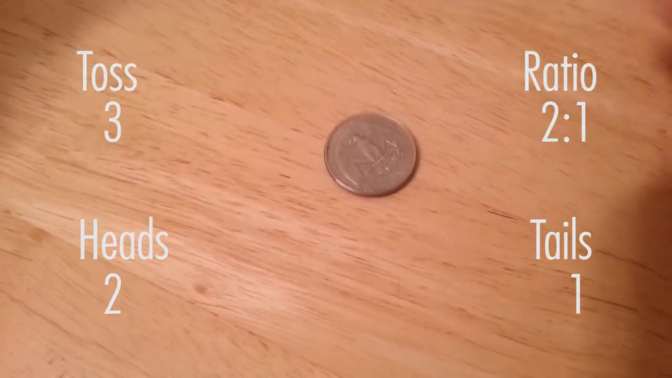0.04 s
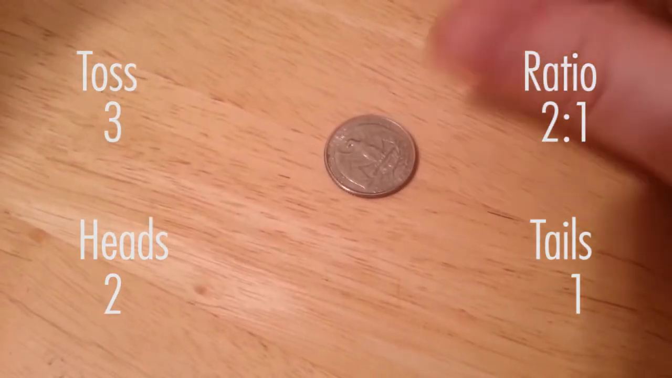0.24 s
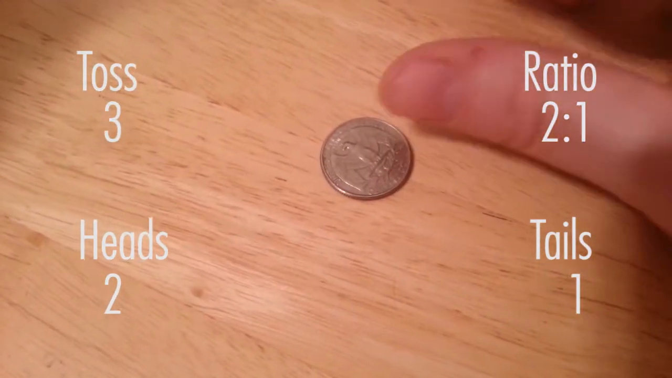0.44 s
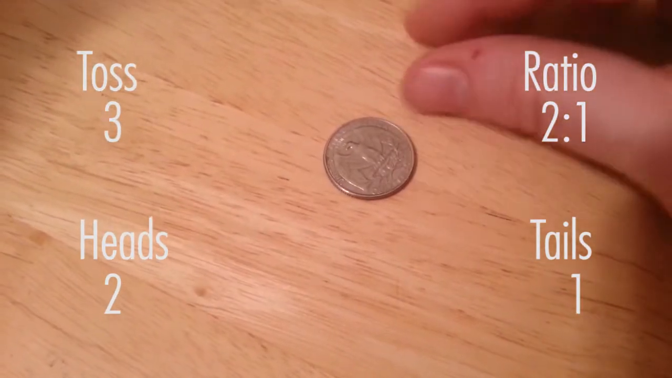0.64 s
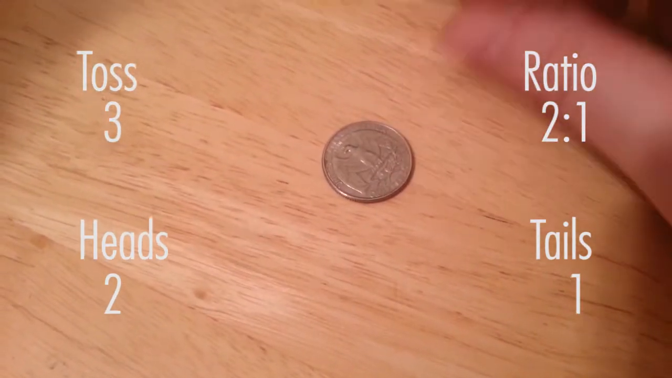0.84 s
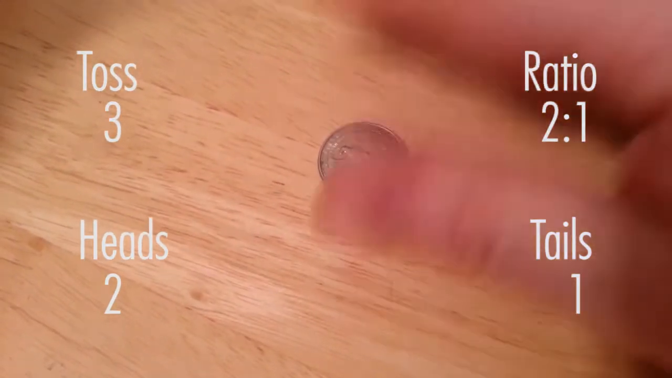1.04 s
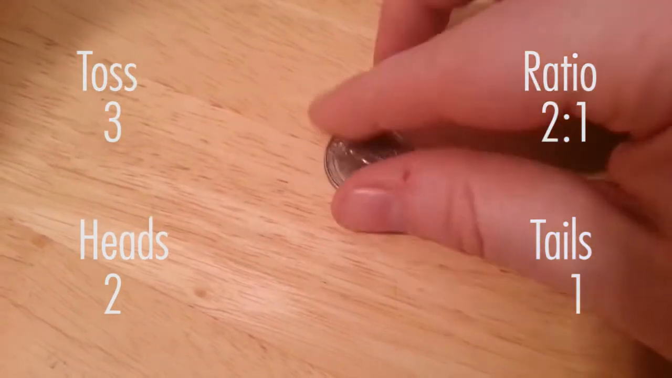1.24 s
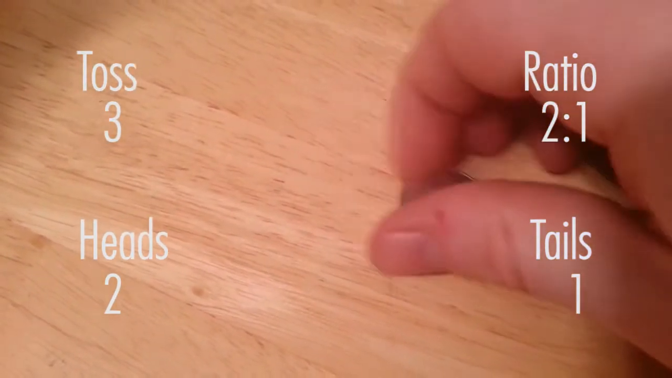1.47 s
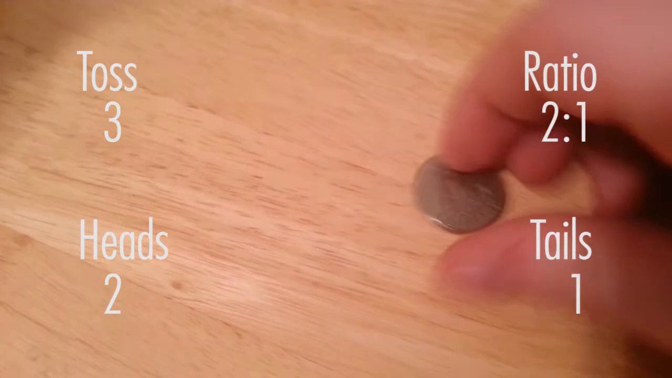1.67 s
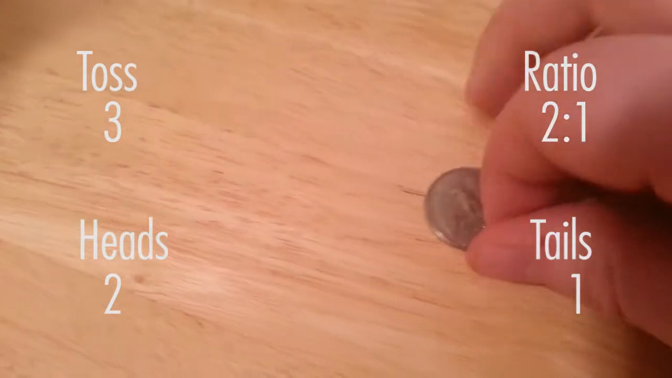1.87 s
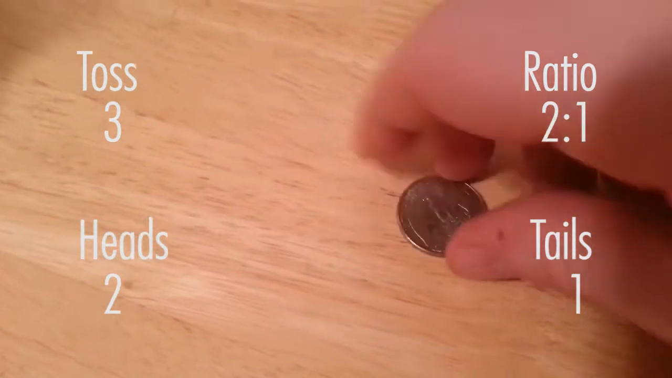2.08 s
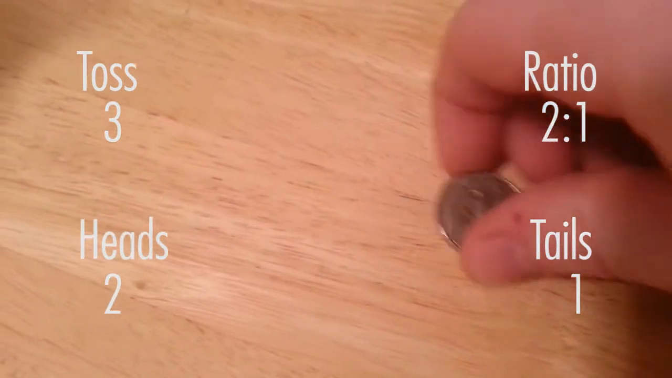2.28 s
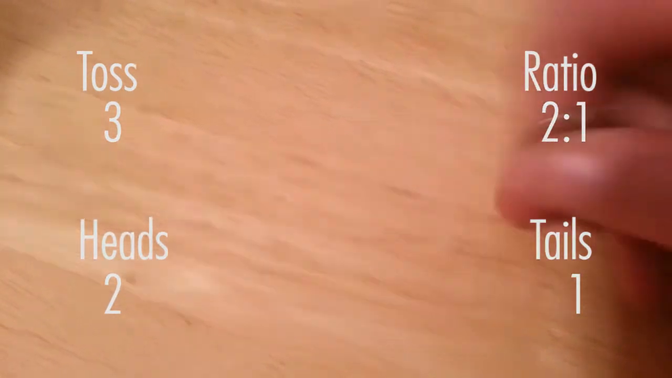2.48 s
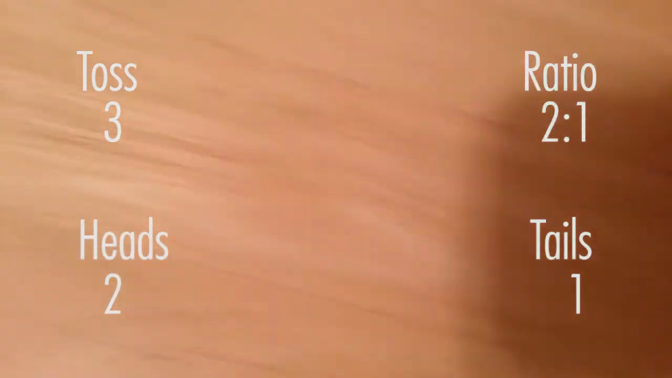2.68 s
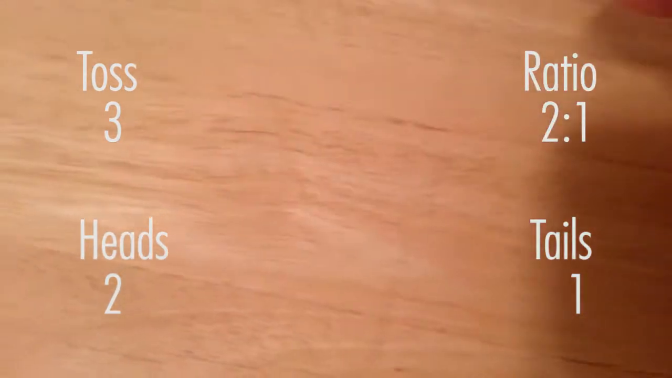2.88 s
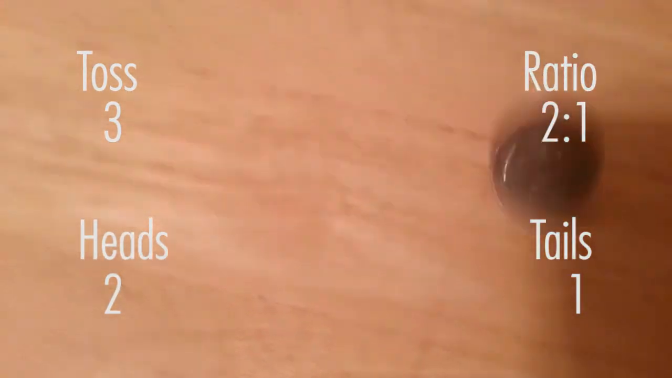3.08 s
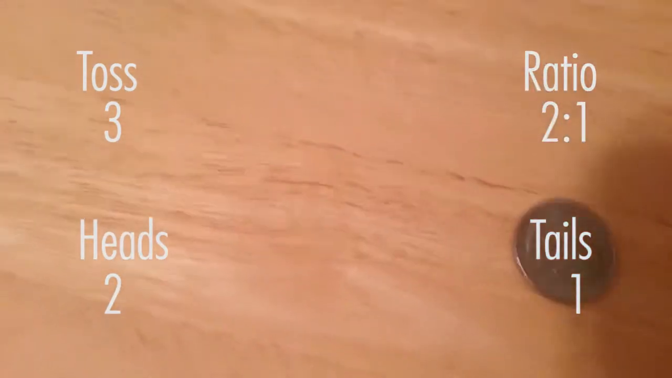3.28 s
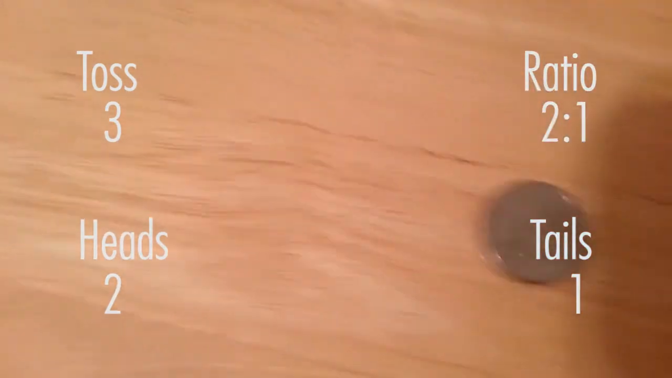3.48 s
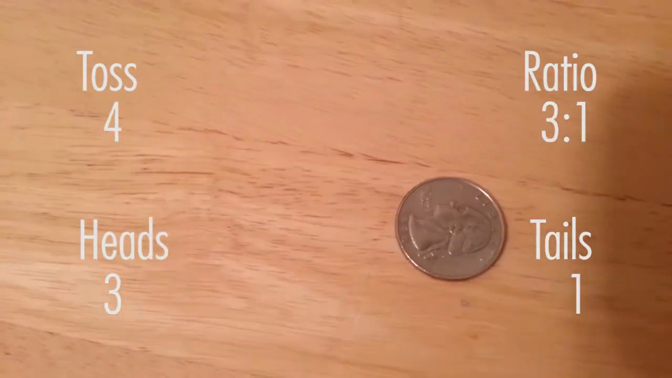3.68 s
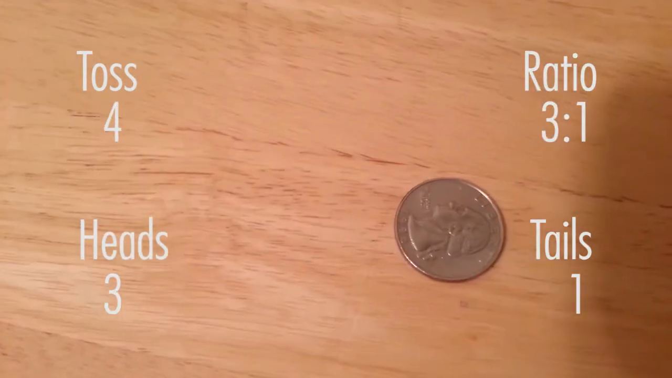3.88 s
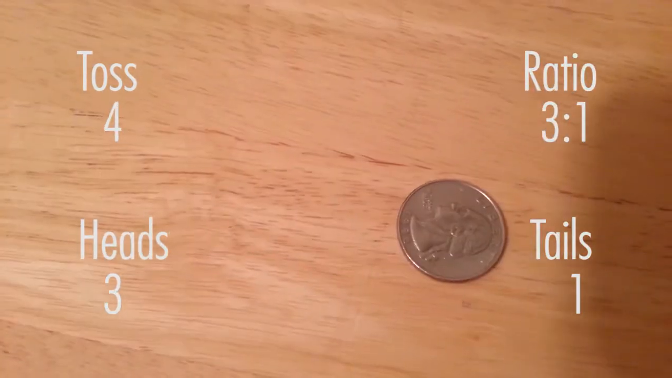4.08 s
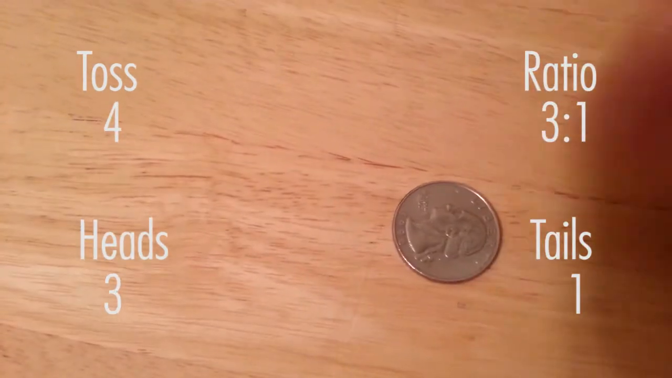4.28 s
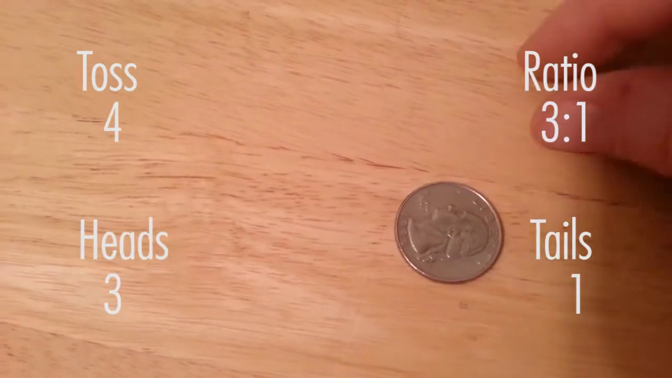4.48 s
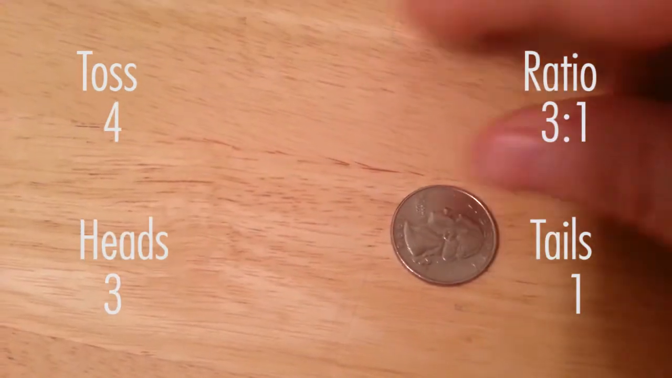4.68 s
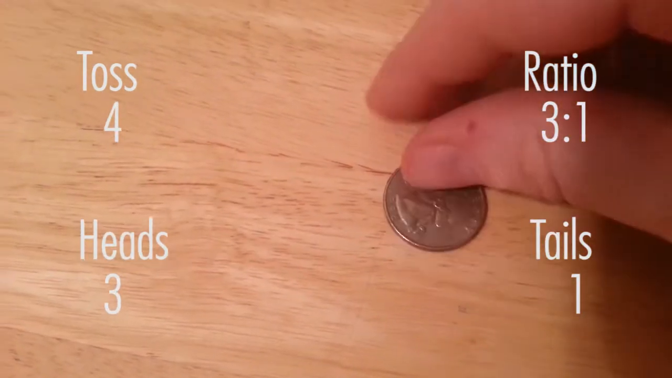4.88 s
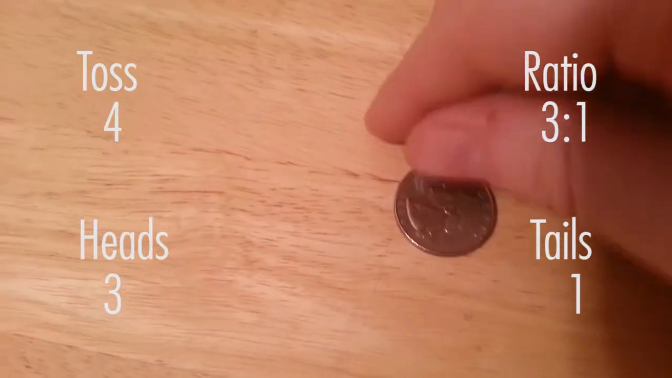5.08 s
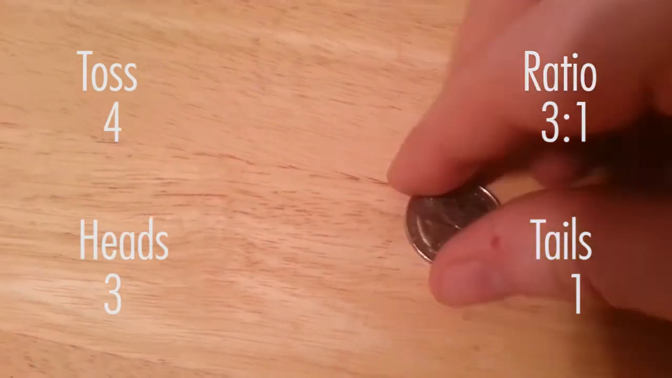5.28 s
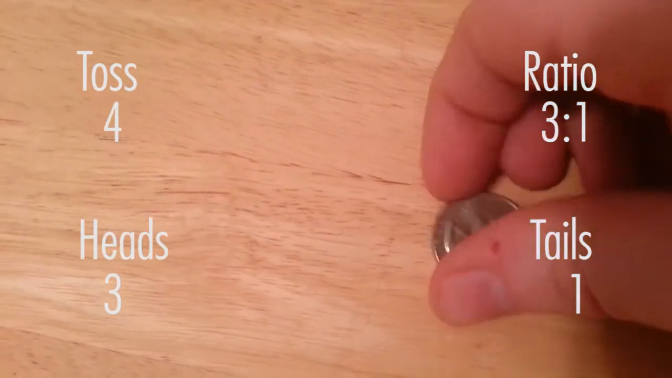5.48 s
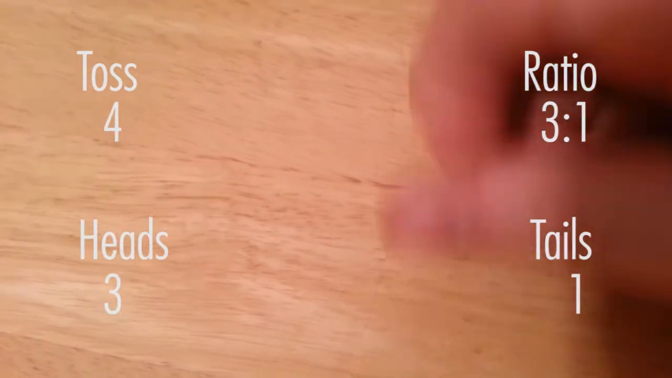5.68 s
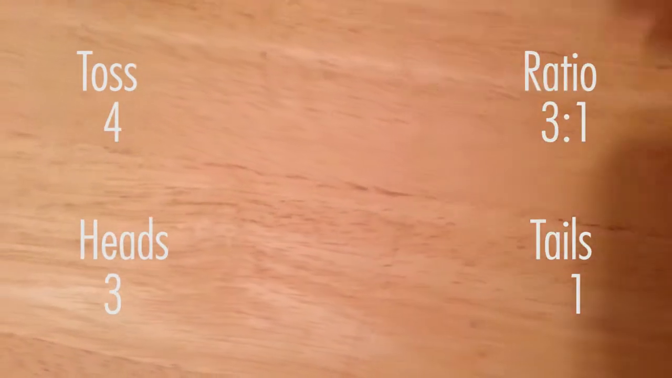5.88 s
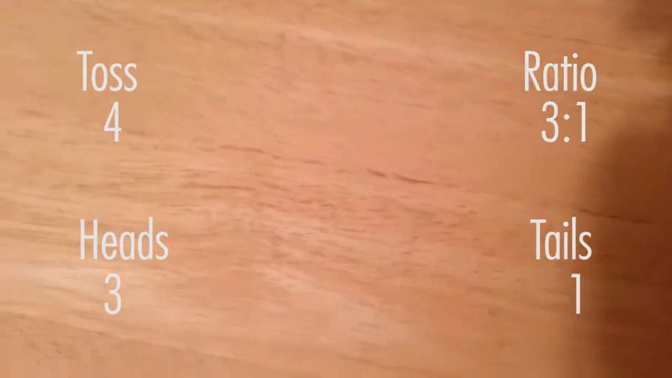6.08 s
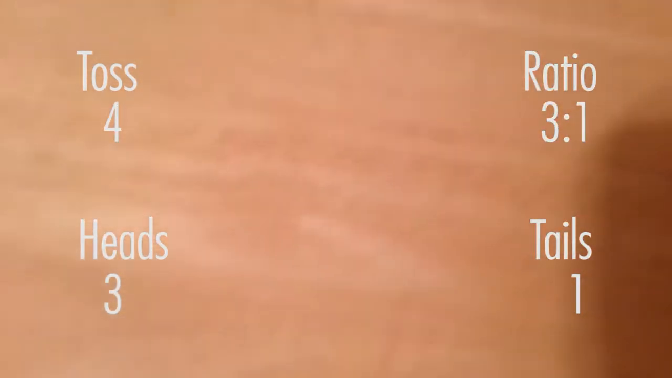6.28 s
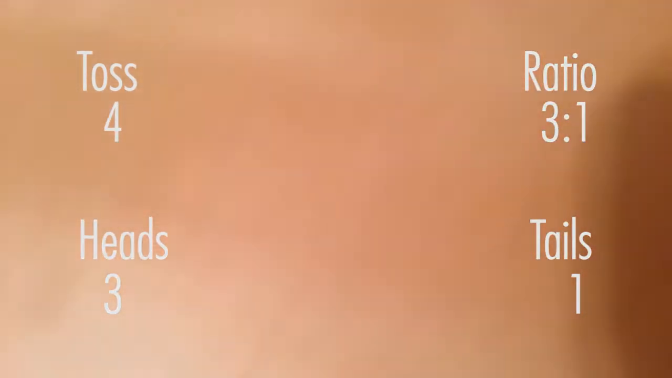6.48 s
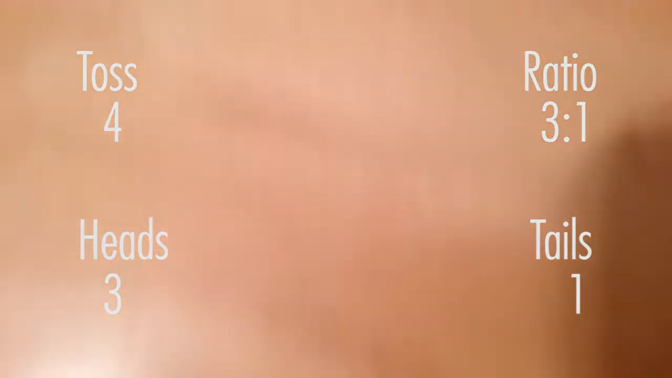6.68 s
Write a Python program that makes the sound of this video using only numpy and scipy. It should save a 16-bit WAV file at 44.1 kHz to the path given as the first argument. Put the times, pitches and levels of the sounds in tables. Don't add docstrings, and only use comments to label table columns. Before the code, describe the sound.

Close to a wooden table in a small room, a metal coin finishes rattling. Dull arm thumps, dragging skin and metal, light clicks and a cloth swish lead to a toss: a hard, overloaded knock, bright metallic ringing and an accelerating clatter that stops abruptly. Gentle handling and a short scrape follow, then another heavy, flatter landing with quick dull bounces. Soft hiss and rumble stay underneath.

```python
import sys
import numpy as np
from scipy import signal
from scipy.fft import rfft, irfft
from scipy.io import wavfile
from scipy.ndimage import uniform_filter1d

SR = 44100
rng = np.random.default_rng(int(sys.argv[2]) if len(sys.argv) > 2 else 0)


def amplitude_ratio(level_db):
    exponent = np.asarray(level_db, float) / 20
    return 10 ** exponent


def generate_wav(sig):
    pcm = np.round(np.clip(np.atleast_2d(sig).T, -1, 1) * 32767).astype(np.int16)
    wavfile.write(sys.argv[1], SR, pcm)


N = 297234


def evened(x):
    return x / np.sqrt(np.mean(x ** 2) + 1e-20)


def read(points, hz):
    f, value = np.transpose(points)
    return np.interp(np.log(hz + 1), np.log(f + 1), value)


def add(mix, s, sound):
    part = mix[..., round(s * SR):][..., :sound.shape[-1]]
    part += sound[..., :part.shape[-1]]


def band_filter(x, order, hz, kind):
    return signal.sosfilt(signal.butter(order, hz, kind, fs=SR, output="sos"), x)


def pair_noise(count, colour, same):
    hz = np.fft.rfftfreq(count, 1 / SR)
    a, b = rfft(rng.standard_normal((2, count)))
    likeness = read(same, hz)
    right = likeness * a + np.sqrt(1 - likeness ** 2) * b
    return irfft(np.array([a, right]) * amplitude_ratio(read(colour, hz)), count)


def resonate(x, hz, width):
    turn = np.exp(2j * np.pi * np.cumsum(hz) / SR)
    r = np.exp(-np.pi * width / SR)
    return 2 * (turn * signal.lfilter([1 - r], [1, -r], x / turn)).real


def chatter(count, chatter_db, per_s):
    size = amplitude_ratio(chatter_db * np.minimum(rng.exponential(1, count), 5))
    return evened(size * rng.choice([-1, 1], count) * (rng.random(count) < per_s / SR))


def stroke(peak, rise, fall, db):
    t = np.arange(-min(rise, peak), fall, 1 / SR)
    far = np.where(t < 0, -t / rise, t / fall)
    gain = amplitude_ratio(db - 16.5 * far ** 1.36)
    return peak + t[0], t, gain * np.minimum((fall - t) / .004, 1)


# f/Hz, level/dB [per Hz]
KNOCK_COLOUR = [(53, -45), (90, -7), (248, -9), (301, -14.5), (357, 3.5), (599, -14), (667, -12.5),
                (1300, -3), (3290, -10), (6980, -18), (8300, -24.5), (9860, -21), (10700, -29.5),
                (15500, -34)]
# f/Hz, t60/s
ROOM_FADE = [(150, 0.31), (400, 0.41), (1040, 0.33), (2760, 0.42), (7280, 0.29), (14000, 0.08)]
# f/Hz, likeness [-1 to 1]
KNOCK_SAME = [(60, 0.69), (180, 0.99), (550, 0.63), (1650, -0.11), (4970, 0.14), (15000, 0.58)]
# f/Hz, width/Hz, level/dB
BOARD_MODES = [(255, 25, -3), (366, 18, -2), (497, 25, 0), (547, 25, -3), (673, 16, -5), (759, 20, -6),
               (964, 24, -7), (1105, 16, -6), (1179, 18, -4), (1495, 25, -5), (2014, 24, -2), (2332, 36, 0),
               (2756, 27, 2), (2940, 25, -3), (3181, 18, -2), (3340, 40, 0), (4235, 45, -6), (4890, 70, -2),
               (5906, 40, -13), (7060, 100, -14), (9540, 130, -12)]


def knock(board_db=-.6, crack_db=9.5, crack_s=.004, rise_s=.0003, tick_db=9., tick_s=.001):
    t = np.arange(16384) / SR
    hz, frame, z = signal.stft(pair_noise(len(t), KNOCK_COLOUR, KNOCK_SAME), SR, nperseg=256)
    z = z * amplitude_ratio(-60 * frame / read(ROOM_FADE, hz)[:, None])
    tail = signal.istft(z, SR, nperseg=256)[1][:, :len(t)]
    tail *= 1 + amplitude_ratio(crack_db) * np.exp(-t / crack_s)
    board = np.zeros((2, len(t)))
    for hz, width, db in BOARD_MODES:
        db = db + 2.5 * rng.standard_normal()
        phase = 2 * np.pi * rng.random((2, 1)) * min(hz / 2000, 1)
        ring = np.exp(-np.pi * width * t) * np.sin(2 * np.pi * hz * t + phase)
        board += amplitude_ratio(db) * np.sqrt(width) * ring
    both = (evened(tail) + amplitude_ratio(board_db) * evened(board)) * (1 - np.exp(-t / rise_s))
    body = band_filter(both * (1 + 1.3 * np.exp(-t / .001)), 4, [700, 4500], "band")
    edge = band_filter(both * (1 + amplitude_ratio(tick_db) * np.exp(-t / tick_s)), 4, 4500, "high")
    boom = band_filter(both, 3, 700, "low")
    return [band / np.linalg.norm(band[0]) for band in (body, edge, boom)]


def table():
    force = np.zeros((3, 3, N))
    for contact in (roll, drag, tap, spin, flop):
        contact(force)
    out = np.zeros((2, N))
    for trains in force:
        for train, answer in zip(trains, knock()):
            out += signal.oaconvolve(train[None], answer, axes=1)[:, :N]
    return out


# peak t/s, rise/s, fall/s, level/dB, edge sharpness/dB
ROLLS = [(0, .011, 0.021, -30, 3), (0, 0.012, 0.2, -25.5, -9), (0.099, 0.089, 0.3, -30, -9),
         (.185, 0.063, 0.052, -22, -4), (.245, 0.036, 0.07, -25, -3), (0.299, .05, 0.069, -24, -6),
         (3.24, .1, 0.39, -24, -7.5), (3.61, .09, 0.14, -28, -10.5), (6.4, 0.094, 0.061, -23.5, -34),
         (6.525, 0.028, 0.093, -20.5, -23), (6.685, 0.051, 0.042, -21.5, -15.5)]


def roll(force, rim_hz=2980, rim_width_hz=3850, rim_db=-3.5, boom_db=-9):
    for peak, rise, fall, db, edge_db in ROLLS:
        s, t, gain = stroke(peak, rise, fall, db)
        grains = chatter(SR, 1.5, 1500)[:len(t)] * gain
        spot = rng.integers(0, 3, len(t))
        for k in range(3):
            part = grains * (spot == k)
            bright = resonate(part, rim_hz + 0 * t, rim_width_hz) * SR / (2 * np.pi * rim_width_hz)
            rim = part + amplitude_ratio(rim_db) * bright
            add(force[k], s, np.array([rim / 2, part * amplitude_ratio(edge_db), part * amplitude_ratio(boom_db)]))


# t/s, level/dB, t60/s, damping by contact [from 0, capped at 3]
RINGS = [(0., -29, 0.34, 2.7), (.065, -37.5, 0.95, 3.5), (.165, -29, 0.79, 3.3), (.198, -30.5, .45, 2.9),
         (0.262, -38, 0.34, 2.3), (3.012, -44, 1.1, 0.37), (3.156, -20, 0.33, 0.39),
         (3.232, -26.5, 0.18, 1.4), (3.296, -29.5, 1, 3.7), (3.346, -20, 0.22, 3.5),
         (3.394, -23.5, .2, 3.55), (3.434, -21, 0.11, 3.4), (3.474, -28.5, 0.16, 2.1),
         (3.53, -33.5, 0.55, 1.7), (3.575, -35, .2, 3.2), (3.64, -42.5, 0.57, 2.4),
         (6.235, -46.5, 0.99, .4), (6.37, -48.5, 1.6, .44), (6.51, -49.5, 1.1, 0.57),
         (6.66, -59, 0.3, 0.36)]
FLAT_S = [
    0.322,
    3.71,
    6.74,
]


def coin(ring_hz=9536, split_hz=22, lean_db=3.5, wet_db=-4.5, echo_t60=.08):
    out, t = np.zeros((2, N)), np.arange(SR // 2) / SR
    for s, db, t60, damping in RINGS:
        scatter = 7 * np.clip(damping, 0, 3) * rng.standard_normal((2, len(t)))
        drift = np.cumsum(scatter, 1) / np.sqrt(SR)
        turn = 2 * np.pi * (ring_hz + split_hz * np.array([[-1], [1]])) * t + drift
        ring = evened(np.cos(turn[0]) + .7 * np.cos(turn[1]))
        ring *= (1 - np.exp(-t / .0047)) * amplitude_ratio(-60 * t / t60)
        flat_after = min(f for f in FLAT_S if f > s) - s
        ring *= np.clip((min(flat_after, t[-1]) - t) / 0.036, 0, 1)
        add(out, s, amplitude_ratio(db + lean_db * np.array([[1], [-1]])) * ring)
    t = np.arange(6000) / SR
    echo = rng.standard_normal((2, len(t))) * amplitude_ratio(-60 * t / echo_t60)
    echo /= np.linalg.norm(echo[0])
    return out + amplitude_ratio(wet_db) * signal.oaconvolve(out, echo, axes=1)[:, :N]


# f/Hz, level/dB [per Hz]
HUSH_COLOUR = [(15, -67), (25, -14.5), (71, 3), (113, -4), (203, -6.5), (304, -8.5), (358, -13),
               (420, -13.5), (481, -15), (1170, -23.5), (1300, -22.5), (2220, -25.5), (5120, -24),
               (15400, -34.5)]
# f/Hz, likeness [-1 to 1]
HUSH_SAME = [(60, 0.63), (180, 0.72), (550, 0.28), (1650, 0.11), (4970, -0.52), (15000, 0.24)]


def hush(level_db=-47.5, swell_db=.9, split_hz=600):
    swell = evened(uniform_filter1d(rng.standard_normal(N), 5000))
    noise = amplitude_ratio(level_db) * evened(pair_noise(N, HUSH_COLOUR, HUSH_SAME))
    rumble = signal.sosfiltfilt(signal.butter(2, split_hz, fs=SR, output="sos"), noise)
    return noise + (amplitude_ratio(swell_db * swell) - 1) * rumble


# peak t/s, rise/s, fall/s, level/dB, hollow under the fingers f/Hz
DRAGS = [(.442, .012, 0.033, -50, 1495), (.57, .12, 0.19, -54, 1450), (1.255, .09, 0.05, -50, 1680),
         (1.36, .08, 0.057, -55, 1730), (1.455, .06, 0.071, -42, 2260), (1.58, .07, 0.15, -54.5, 1880),
         (1.7, .07, 0.033, -38.5, 2900), (1.755, .05, 0.049, -37.5, 1840), (1.83, .03, 0.045, -32.5, 900),
         (2.005, .02, 0.046, -50, 1920), (2.07, .012, 0.042, -46, 1240), (2.176, .02, 0.089, -43.5, 1800),
         (2.39, .011, 0.043, -40.5, 2260), (2.435, .04, 0.087, -49, 1370), (4.44, .03, 0.18, -58, 1155),
         (4.612, .012, 0.051, -45.5, 1050), (4.71, .05, 0.058, -60.5, 1400),
         (4.865, .08, 0.037, -45.5, 1900), (5.078, .05, 0.037, -56, 1390), (5.29, .04, 0.14, -52, 2200),
         (5.5, .25, 0.51, -55.5, 2250), (5.684, 0.014, 0.012, -24.5, 1220), (1.5, .07, 0.13, -45.5, 4030),
         (1.745, .07, 0.062, -44.5, 4230)]


def drag(force, hollow_width_hz=450, hollow_db=-2.5, close_hz_per_s=2000):
    for k, (peak, rise, fall, db, hz) in enumerate(DRAGS):
        s, t, gain = stroke(peak, rise, fall, db)
        grains = chatter(SR, 3, 1200)[:len(t)]
        hollow_hz = np.maximum(hz - close_hz_per_s * t, .7 * hz)
        hollow = evened(resonate(grains, hollow_hz, hollow_width_hz))
        cupped = evened(grains + amplitude_ratio(hollow_db) * hollow)
        harder_db = db + 49.5
        edge = grains * amplitude_ratio(-14 - .6 * harder_db)
        boom = grains * amplitude_ratio(2.5 - .5 * harder_db)
        add(force[k % 3], s, gain * np.array([cupped, edge, boom]))


# t/s, level/dB [peak], f/Hz, t60/s
THUMPS = [(0.432, -40.5, 74, 0.075), (0.552, -37, 79.8, 0.17), (0.828, -50, 74, 0.15),
          (1.129, -32.5, 116, 0.16), (1.526, -22, 85, 0.084), (2.175, -25, 74, 0.14),
          (2.383, -24, 79, 0.091), (2.596, -34.5, 132.3, 0.21), (2.72, -41, 79, 0.13),
          (2.948, -41, 139.6, 0.14), (4.376, -30, 66.3, 0.14), (4.681, -28.5, 98.4, 0.072),
          (4.848, -58.5, 73.5, 0.42), (5.569, -29.5, 120.6, 0.11), (6.598, -29, 73.7, 0.13)]


def thumps(rise_s=0.0072, second=1.7, second_db=-3.5):
    out, t = np.zeros(N), np.arange(14000) / SR
    for s, db, hz, t60 in THUMPS:
        modes = np.sin(2 * np.pi * hz * t) + amplitude_ratio(second_db) * np.sin(2 * np.pi * hz * second * t)
        add(out, s, amplitude_ratio(db + 7 - 60 * t / t60) * (1 - np.exp(-t / rise_s)) * modes)
    return out * amplitude_ratio(.4 * np.array([[1], [-1]]))


# t/s, level/dB [peak]
CREAKS = [
    (0.4394, -29),
    (0.4653, -40),
    (0.4893, -37),
    (0.5137, -35),
    (0.5382, -35),
    (0.5671, -36),
    (0.5846, -36),
    (0.606, -38),
]


def creak(hz=1500, t60=.025, width_hz=600):
    out, t = np.zeros((2, N)), np.arange(2500) / SR
    for s, db in CREAKS:
        noise = rng.standard_normal((2, len(t)))
        tick = evened(band_filter(noise, 2, [hz - width_hz / 2, hz + width_hz / 2], "band"))
        add(out, s, amplitude_ratio(db + 1 - 60 * t / t60) * tick)
    return out


def blow(force, spot, s, db, edge_db, boom_db, graze=0):
    skid_s = .009 * graze * np.append(0, rng.random(4))
    share = np.append(1, graze * rng.choice([-1, 1], 4))[:, None]
    touch = amplitude_ratio(17 + db + np.array([0, edge_db, boom_db])) / np.linalg.norm(share)
    np.add.at(force[spot].T, ((s + skid_s) * SR).astype(int), touch * share)


# t/s, level/dB, edge sharpness/dB, table boom/dB
TAPS = [(1.257, -29, -32, -28), (1.326, -38, -17, 4.5), (1.528, -27.5, -19, 5), (1.537, -20.5, -19, -33),
        (1.639, -26, -29, -11), (1.675, -26, -23, -4.5), (1.798, -23, -26, 16), (1.84, -30, -8, 15.5),
        (2.0, -30.5, -40, 5), (2.068, -33, -34, -8), (2.173, -23.5, -40, 0), (2.385, -31, -22, 2),
        (4.61, -43, -27.5, -16), (5.077, -43, -32.5, 0), (5.288, -31.5, -37, -2.5), (5.438, -37, -12, 4),
        (5.526, -41.5, -8, 3), (5.574, -33.5, -26, 7), (5.68, -45.5, -28.5, -23), (6.144, -39, -11, -17.5)]


def tap(force):
    for k, row in enumerate(TAPS):
        blow(force, k % 3, *row)


# peak t/s, rise/s, fall/s, level/dB
SLIDES = [
    (2.32, .12, 0.18, -53),
    (2.6, 0.26, 0.19, -52),
    (2.76, .08, 0.15, -52.5),
    (5.3, .15, 0.23, -54),
    (5.52, 0.2, 0.35, -50.5),
    (5.7, 0.057, 0.12, -40),
]


def slide(hz=1168, width_hz=120):
    out, rub = np.zeros(N), rng.standard_normal(N)
    for row in SLIDES:
        s, t, gain = stroke(*row)
        add(out, s, gain)
    curve, hum = np.full(N, hz), []
    for noise in (rub, rub + rub[::-1]):
        narrow = resonate(noise, curve, width_hz)
        hum.append(evened(resonate(narrow, curve, 2 * width_hz)))
    return out * np.array(hum)


# f/Hz, level/dB [per Hz]
SLEEVE_COLOUR = [(200, 8.5), (600, -2.5), (2000, -3), (6000, -5), (12000, -15.5), (15500, -34.5)]


def swish():
    out = np.zeros((2, N))
    s, t, gain = stroke(peak=2.645, rise=0.066, fall=0.16, db=-42.5)
    add(out, s, gain * evened(pair_noise(SR, SLEEVE_COLOUR, HUSH_SAME))[:, :len(t)])
    return out


def bounce_boom_db(db):
    return -10.5 + 0.12 * min(db, 0)


# t/s, level/dB, edge sharpness/dB
SPIN = [(3.007, 13, -20.5), (3.075, 3, -24), (3.131, -3.5, -19.5), (3.153, 4.5, -3.5), (3.219, -4, -10),
        (3.232, -2.5, 1.3), (3.287, -10.5, -5.5), (3.296, -0.5, -1.5), (3.34, -12.5, -20), (3.348, -4, -2),
        (3.391, -5.5, -1.5), (3.401, -17, -11), (3.434, -11, -3), (3.474, -10, -5.5), (3.509, -14.5, -8),
        (3.544, -6.5, -9.5), (3.561, -15, -11.5), (3.574, -15.5, -1.5), (3.606, -12, -4),
        (3.629, -15, -11.5), (3.654, -16.5, -4), (3.672, -9, -11), (3.689, -17.5, -5.5),
        (3.702, -19.5, -8.5)]


def spin(force):
    for k, (s, db, edge_db) in enumerate(SPIN):
        graze = np.clip(.45 - db / 11, 0, 1)
        blow(force, k % 3, s, db, edge_db, bounce_boom_db(db), graze)


# t/s, level/dB, edge sharpness/dB
FLOP = [
    (6.231, 15, -22.5),
    (6.327, 6, -16.5),
    (6.366, 1.5, -16),
    (6.4, -4.5, -41),
    (6.439, -1.5, -74),
    (6.466, -4.5, -31),
    (6.488, -8, -36),
    (6.507, -7.5, -28.5),
    (6.517, -9.5, -30),
]


def flop(force):
    for k, (s, db, edge_db) in enumerate(FLOP):
        blow(force, k % 3, s, db, edge_db, bounce_boom_db(db))


def scene():
    loud = table() + coin()
    power = signal.lfilter([.003], [1, -.997], (loud ** 2).mean(0))
    level_db = 10 * np.log10(power + 1e-12)
    floor = hush()
    treble = signal.sosfiltfilt(signal.butter(2, 6000, "high", fs=SR, output="sos"), floor)
    floor += treble * (amplitude_ratio(-.8 * np.maximum(level_db + 34, 0)) - 1)
    return loud + floor + thumps() + creak() + slide() + swish()


def top_cut(x):
    return signal.sosfilt(signal.butter(12, 15650, fs=SR, output="sos"), x)


def record(dry):
    clipped = np.clip(dry, -1, 1)
    mix = band_filter(band_filter(clipped, 2, 45, "high"), 2, 25, "high")
    return top_cut(mix)


dry = scene()
out = record(dry)
generate_wav(out)
```